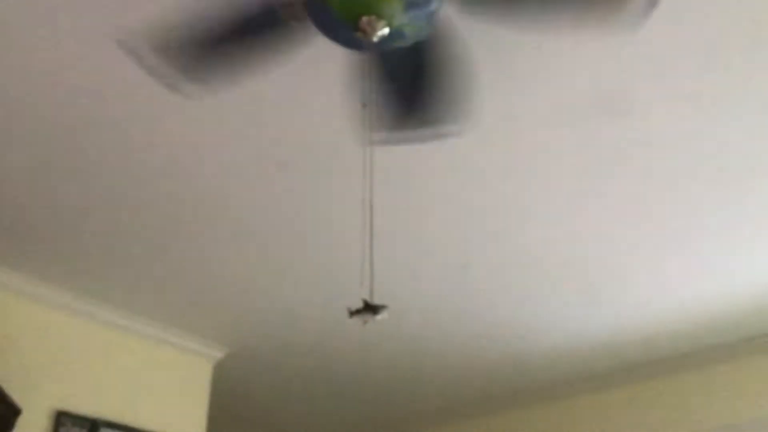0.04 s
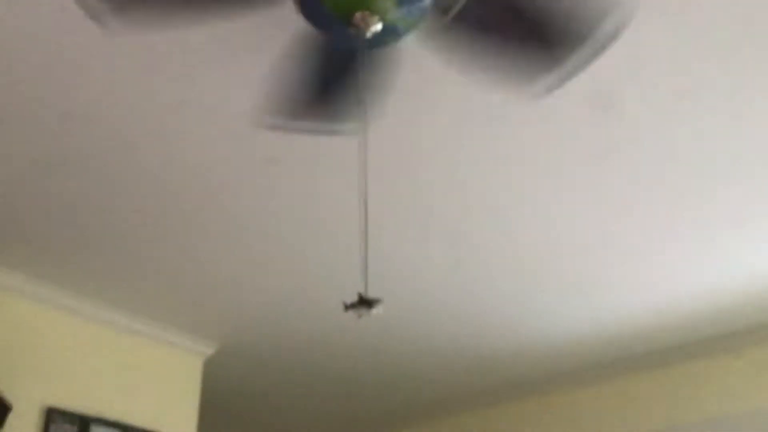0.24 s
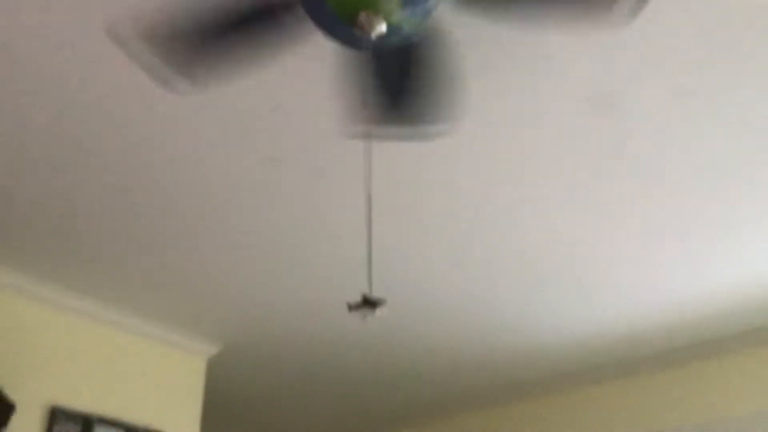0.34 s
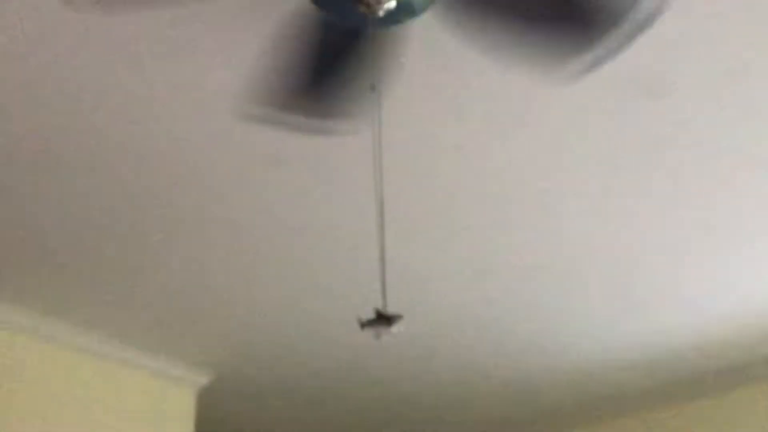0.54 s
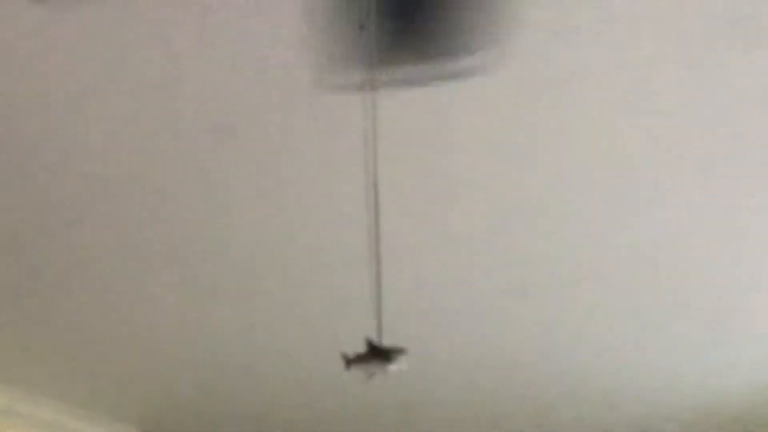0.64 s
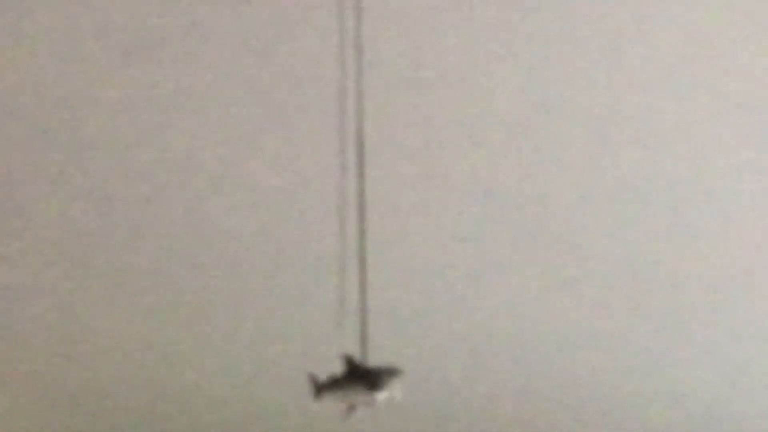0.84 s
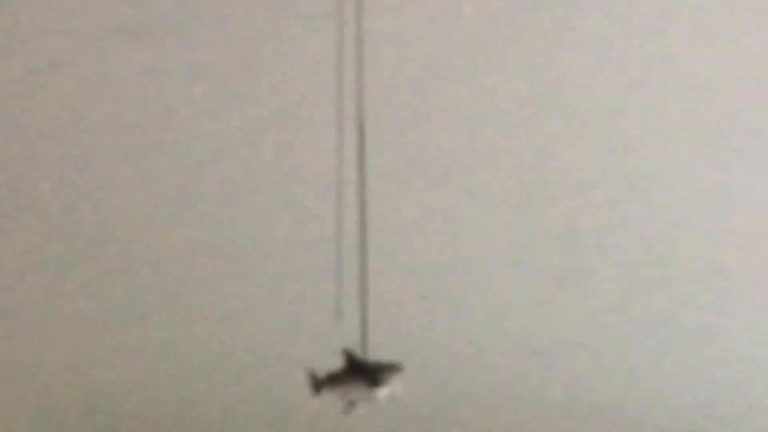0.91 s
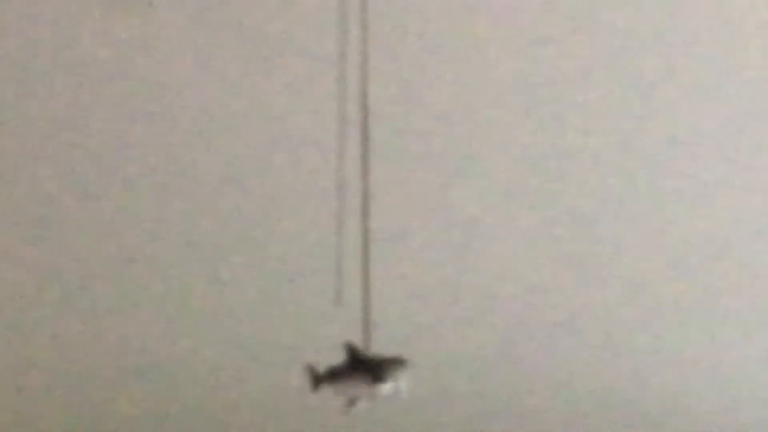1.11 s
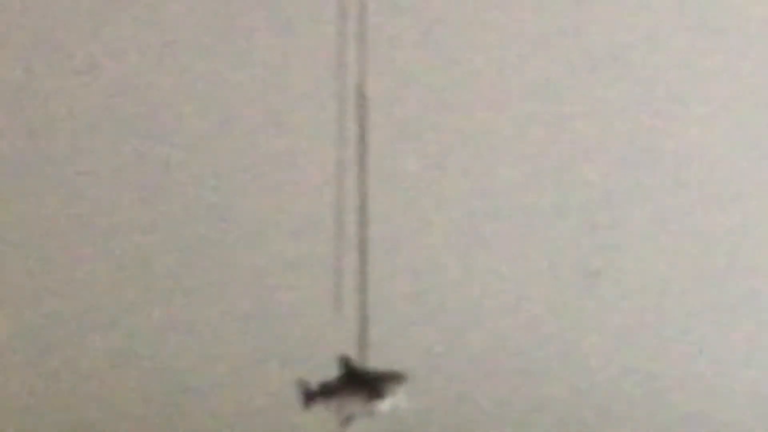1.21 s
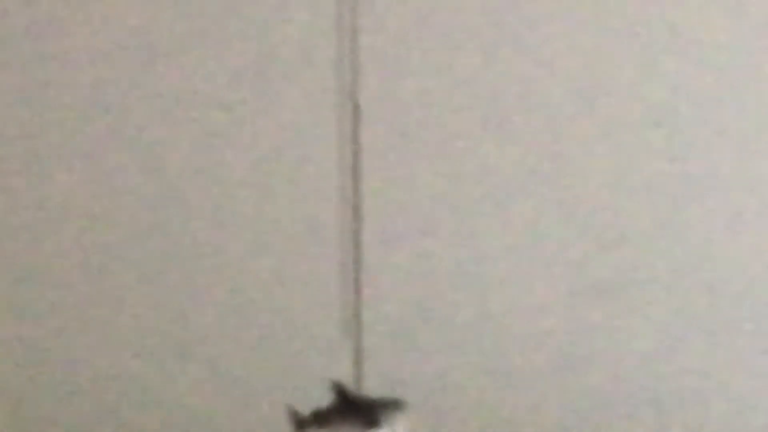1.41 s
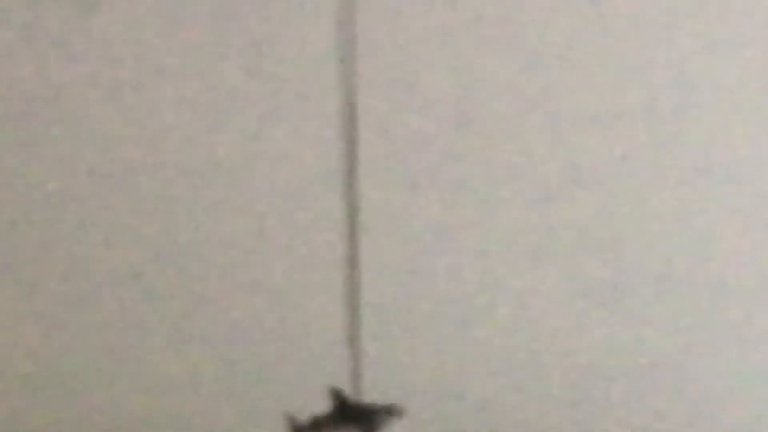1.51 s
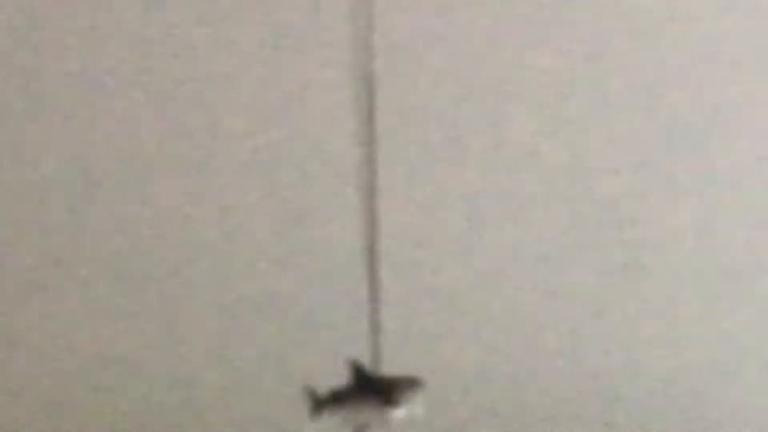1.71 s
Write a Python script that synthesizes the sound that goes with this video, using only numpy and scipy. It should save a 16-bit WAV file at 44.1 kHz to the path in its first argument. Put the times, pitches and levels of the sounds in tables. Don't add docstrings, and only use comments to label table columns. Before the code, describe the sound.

Camera handling noise, very close: soft thuds, hard plastic snaps and brief skin scuffs cluster in the first second, then thin out, over low ceiling-fan air, faint hiss and tiny lens ticks in a quiet room.

```python
import sys
import numpy as np
from scipy import signal
from scipy.fft import rfft, irfft, next_fast_len
from scipy.io import wavfile
from scipy.ndimage import uniform_filter1d

SR = 44100
rng = np.random.default_rng(int(sys.argv[2]) if len(sys.argv) > 2 else 0)


def linear_from_db(decibels):
    return 10 ** (np.asarray(decibels, float) / 20)


def unload_wav(signal):
    wavfile.write(
        sys.argv[1],
        SR,
        np.round(np.clip(np.atleast_2d(signal).T, -1, 1) * 32767).astype(np.int16),
    )


N = 77175
HZ = np.fft.rfftfreq(N, 1 / SR)


def evened(x):
    return x / np.sqrt(np.mean(x ** 2) + 1e-20)


def coloured(x, spectrum, tilt_db=0.):
    hz = np.fft.rfftfreq(len(x), 1 / SR) + 1
    f, db = np.transpose(spectrum)
    gain_db = np.interp(np.log(hz), np.log(f), db) + tilt_db * np.log2(hz / 2000)
    return irfft(rfft(x) * linear_from_db(gain_db), len(x))


def coloured_noise(spectrum):
    return evened(coloured(rng.standard_normal(N), spectrum))


def add(mix, s, sound):
    part = mix[round(s * SR):][:len(sound)]
    part += sound[:len(part)]


# f/Hz, level/dB
FAN_SPECTRUM = [(30, -45.5), (60, -0.5), (130, -2.5), (230, 1), (420, -5.5), (650, -17), (1500, -35.5),
                (3000, -50.5)]
# f/Hz, level/dB
HISS_SPECTRUM = [(1000, 13), (3000, 1), (5000, 3.5), (6200, -2), (8000, 1.5), (12600, -4), (14000, 1.5),
                 (14900, -6.5)]
FAN_DB, FAN_SWELL_DB, HISS_DB = -53.5, .8, -72.5


def air():
    swell = uniform_filter1d(rng.standard_normal(N), size=900)
    swell = evened(uniform_filter1d(swell, size=900))
    wash = coloured_noise([*FAN_SPECTRUM, (16000, -70)]) * linear_from_db(FAN_DB + FAN_SWELL_DB * swell)
    return wash + linear_from_db(HISS_DB) * coloured_noise([(200, -20), *HISS_SPECTRUM])


# first tick t/s, last tick t/s, rate/(ticks per s), level/dB
MOTOR_RUNS = [
    (.0110, .41, 60, -57),
    (.4277, .62, 30, -57),
    (.4460, .60, 30, -57),
    (.6277, 1.08, 60, -57),
    (1.1777, 1.47, 60, -57),
    (.0155, .46, 29.99, -57),
    (.6490, 1.75, 29.98, -57),
]
# f/Hz, width/Hz, level/dB
LENS_PARTS = [(3030, 290, -9.5), (5000, 560, -2), (7640, 630, -4.5), (9790, 560, -7.5), (13820, 450, -5)]
TICK_DB, TICK_JITTER_S = -1, .0001
RATTLE, RATTLE_S = .35, .0021


def lens():
    t = np.arange(200) / SR
    steps = np.zeros(N)
    rattle_fade = RATTLE * np.exp(-t / RATTLE_S) / np.sqrt(RATTLE_S * SR / 2)
    for first, last, rate, level_db in MOTOR_RUNS:
        for s in np.arange(first, last, 1 / rate):
            late = TICK_JITTER_S * rng.standard_normal()
            kick = (t == 0) + rattle_fade * rng.standard_normal(200)
            add(steps, s + late, linear_from_db(level_db + TICK_DB) * kick)
    ring = np.zeros(200)
    for k, (hz, width, db) in enumerate(LENS_PARTS):
        ring += (-1) ** k * linear_from_db(db) * np.exp(-np.pi * width * t) * np.sin(2 * np.pi * hz * t)
    return signal.oaconvolve(steps, ring)[:N]


# f/Hz, width/Hz, lift level/dB
CASE_MODES = [(590, 65, 6.5), (900, 140, 8), (1440, 73, 2.5), (2207, 106.5, 3.5), (2800, 140, 1.5),
              (4010, 500, 5), (5660, 730, 6.5)]


def case_db(hz):
    return sum(db / (1 + ((hz - f) / width) ** 2) for f, width, db in CASE_MODES)


# f/Hz, level/dB
SKIN_SPECTRUM = [(150, 11), (450, 3.5), (1000, -3.5), (2200, -2), (3150, -9.5), (3500, -17), (8000, -23.5),
                 (15000, -27.5)]
TREBLE_HZ = 3400
PATCH_DB, PATCH_HZ = 5, 600


def cased(x, tilt_db):
    hz = np.fft.rfftfreq(len(x), 1 / SR)
    knots_hz = np.arange(0, SR / 2 + PATCH_HZ, PATCH_HZ)
    patch_db = PATCH_DB * np.interp(hz, knots_hz, rng.standard_normal(len(knots_hz)))
    patch_weight = hz * TREBLE_HZ / (hz ** 2 + TREBLE_HZ ** 2) * 1.34
    gain = linear_from_db(case_db(hz) + patch_db * patch_weight)
    return irfft(rfft(coloured(x, SKIN_SPECTRUM, tilt_db)) * gain, len(x))


def slips(grain_db, count, per_s=5500):
    sign, chance, size = rng.random((3, count))
    size_db = grain_db * np.minimum(-np.log(1 - size), 4)
    return np.sign(sign - .5) * (chance < per_s / SR) * linear_from_db(size_db)


# t/s, level/dB
GRIP_LEVEL = [
    (0, -73),
    (.32, -63.5),
    (0.359, -55),
    (.6, -55.5),
    (0.929, -60.5),
    (.96, -80),
    (1.298, -54.5),
    (1.449, -69),
    (1.75, -67),
]
# f/Hz, level/dB
TREMOR_SPECTRUM = [(30, 0.5), (65, -15), (120, -0.5), (200, -16), (400, -37.5)]
TREMOR_DB, TREMOR_FOLLOW = -49, .95


def rubbing():
    t, db = np.transpose(GRIP_LEVEL)
    grip_db = np.interp(np.arange(N) / SR, t, db)
    friction = evened(cased(slips(grain_db=1.2, count=N), tilt_db=-2.4))
    tremor = coloured_noise([*TREMOR_SPECTRUM, (16000, -83.5)])
    tremor_db = TREMOR_DB + TREMOR_FOLLOW * (grip_db - db.max())
    return linear_from_db(grip_db) * friction + linear_from_db(tremor_db) * tremor


# start t/s, length t/s, level/dB, tilt/(dB per octave), place of the peak/(0-1)
SCUFFS = [(0.363, 0.027, -53.5, 2, 0.32), (0.408, 0.039, -56.5, -1, 0.9), (.459, 0.017, -42, 1, 0.06),
          (0.492, 0.02, -46, -0.5, 0.61), (0.516, 0.03, -51, -1, 0.44), (0.555, 0.016, -44.5, -0.2, 0.58),
          (0.606, 0.021, -40.5, 1.07, 0.18), (0.642, 0.021, -60, 1.5, 0.2), (0.6693, 0.026, -42, .5, 0.2),
          (0.719, 0.019, -46.5, 2, 0.06), (0.773, 0.0097, -51, 0.5, 0.8), (0.78, 0.015, -36.5, 2, 0.42),
          (0.8395, 0.017, -41, -0.5, 0.4), (0.864, 0.014, -40.5, -0.76, 0.5),
          (0.895, 0.02, -44.5, -1, 0.25), (0.9773, 0.036, -43, -0.5, 0.18), (1.002, .016, -32.5, 0.5, 0.4),
          (1.163, 0.023, -49.5, 2, 0.4), (1.189, 0.022, -50.5, 1.5, 0.4), (1.277, 0.022, -55.5, -1.5, 0.27),
          (1.291, 0.031, -49.5, -2, 0), (1.393, 0.028, -54, 0, 0.5), (1.433, 0.016, -59, 1, 0.47),
          (1.637, 0.019, -56.5, 2, 0.55)]
FADE_DB, EDGE = -4.5, .28
TREBLE_FADE_DB = -7
LEAD, SPAN = 256, 2560


def scuffs():
    out = np.zeros(N)
    highpass = signal.butter(4, TREBLE_HZ, "high", fs=SR, output="sos")
    for start, length, level_db, tilt_db, peak in SCUFFS:
        u = (np.arange(SPAN) - LEAD) / SR / length
        peak = np.clip(peak, .05, .9)
        away = np.where(u < peak, 1 - u / peak, (u - peak) / (1 - peak))
        ramps = np.minimum(u / min(EDGE, peak / 2), (1 - u) / EDGE)
        shape = np.clip(ramps, 0, 1) * linear_from_db(FADE_DB * away)
        burst = cased(slips(grain_db=5, count=SPAN) * shape, tilt_db)
        treble = signal.sosfiltfilt(highpass, burst)
        burst = burst - treble * (1 - linear_from_db(TREBLE_FADE_DB * away))
        burst *= np.sqrt(length * SR / np.sum(burst ** 2))
        add(out, start - LEAD / SR, linear_from_db(level_db) * burst)
    return out


def knocks(rows):
    out = 0
    case = linear_from_db(case_db(HZ))
    for s, peak_db, centre_hz, spread in rows:
        octaves = np.log2((HZ + 1) / centre_hz)
        hump = case * np.exp(-.5 * (octaves / max(spread, .025)) ** 2)
        height = linear_from_db(peak_db) * N / (2 * hump.sum())
        out = out - height * hump * np.exp(-2j * np.pi * HZ * s)
    return irfft(out, N)


# t/s, peak level/dB, centre f/Hz, spread/octaves
CATCHES = [(0.3506, -47.5, 700, 0.2), (0.3745, -43.5, 2230, 0.16), (0.3751, -47, 4340, 0.059),
           (0.4628, -56, 6000, 0.04), (0.4642, -47.5, 4130, 0.064), (0.4674, -49, 6100, 0.04),
           (0.5259, -55, 2540, 0.09), (0.5285, -50, 2630, 0.074), (0.5595, -55, 2610, 0.065),
           (0.5644, -41.5, 820, 0.32), (0.5648, -50, 2800, 0.08), (0.6085, -38.5, 2100, 0.1),
           (0.6086, -51.5, 5560, 0.025), (0.6092, -52.5, 8940, 0.03), (0.6144, -37.5, 1560, 0.24),
           (0.6147, -38, 2260, 0.13), (0.6757, -52, 5640, 0.065), (0.6762, -48.5, 3800, 0.06),
           (0.6786, -38, 2170, 0.12), (0.6821, -46, 1630, 0.15), (0.7183, -51, 2200, 0.11),
           (0.7186, -41, 2950, 0.096), (0.7217, -43, 1850, 0.1), (0.7227, -46, 4000, 0.11),
           (0.7753, -50, 3790, 0.06), (0.7819, -48, 4130, 0.063), (0.7868, -37.5, 5380, 0.06),
           (0.7869, -58, 6830, 0.03), (0.7951, -52, 4740, 0.0494), (0.8467, -41, 1640, 0.15),
           (0.847, -43, 2550, 0.09), (0.8725, -57, 5080, 0.034), (0.873, -54, 3920, 0.06),
           (0.8999, -44, 2090, 0.13), (0.9036, -45.5, 2320, 0.09), (0.9803, -48, 2520, 0.12),
           (0.9878, -39.5, 2050, 0.093), (0.9931, -38, 2270, 0.14), (0.9949, -38, 1850, 0.12),
           (0.9953, -54, 4520, 0.04), (1.0072, -36.5, 4950, 0.047), (1.0087, -47.5, 7580, 0.034),
           (1.0099, -40.5, 5000, 0.058), (1.0102, -43, 3910, 0.097), (1.0155, -45, 4740, 0.05),
           (1.1663, -46, 1230, 0.29), (1.1904, -40, 593, 0.33), (1.2011, -53, 2280, 0.1)]


def catches():
    return knocks(CATCHES)


# t/s, peak level/dB, centre f/Hz,
# spread/octaves
SNAPS = [(.352, -38.5, 1480, 0.6), (.374, -33.5, 1365, 0.25), (.4070, -50, 900, 0.59),
         (.436, -44, 1220, 0.69), (.7872, -22.5, 2800, 0.0785), (.764, -60.5, 2100, .2),
         (.4632, -28, 2120, 0.21), (.4635, -27.5, 900, 0.72), (.506, -32.5, 1780, 0.39),
         (.564, -40.5, 1490, 0.34), (.6075, -21, 900, 0.56), (.608, -29, 2800, 0.15),
         (.674, -23, 597, 0.36), (.675, -26.5, 2020, 0.33), (.8715, -41.5, 760, 0.09),
         (.779, -36.5, 661, 0.14), (.7869, -11.5, 2037, 0.15), (.7866, -22, 3600, 0.17),
         (.7862, -17, 1540, 0.26), (.787, -34.5, 8870, .07), (.7895, -18.5, 2407, 0.44),
         (.843, -34, 1890, 0.22), (.872, -39, 2100, 0.33), (1.010, -17.5, 1495, 0.43),
         (1.011, -42.5, 930, 0.079), (.9045, -48, 3680, 0.27), (1.174, -29.5, 1380, 0.4),
         (1.192, -46, 2000, 0.23), (1.298, -47.5, 1480, 0.2), (1.649, -54.5, 2480, 0.11),
         (1.682, -42, 736, 0.15), (1.682, -55, 1814, 0.2)]


def snaps():
    return knocks(SNAPS)


# t/s, peak level/dB, centre f/Hz, spread/octaves
THUDS = [(.194, -25.5, 272, 0.53), (.350, -39.5, 258, 0.3), (.373, -28.5, 188, 0.75),
         (.421, -44.5, 318, 0.16), (.461, -37.5, 248, 0.53), (.506, -39, 296, 0.49), (.559, -33, 167, 0.4),
         (.567, -37, 202, 1.1), (.608, -35.5, 164, 0.43), (.623, -32, 178, 0.71), (.673, -25, 277, 0.43),
         (.677, -29.5, 113, 0.34), (.717, -22, 242, 0.89), (.779, -23, 270, 0.67), (.843, -33, 583, 0.26),
         (.871, -35.5, 418, 0.19), (.905, -34.5, 574, 0.23), (.917, -39, 308, 0.45),
         (1.007, -27, 242, 0.38), (1.0075, -24.5, 400.3, 0.14), (1.171, -30, 304, 0.34),
         (1.178, -40.5, 330, 0.22), (1.195, -33.5, 85, 0.59), (1.204, -31.5, 175, 0.93),
         (1.297, -36.5, 380, 0.26), (1.436, -35, 218, 0.83), (1.433, -29, 93.5, 0.73),
         (.776, -27.5, 103, 0.65), (1.641, -33.5, 124, 0.91), (1.648, -30.5, 359, 0.57),
         (.121, -47.5, 214, 0.18), (.348, -56, 208, .2), (.720, -32.5, 111, 0.41), (.903, -40, 310, 0.22),
         (.911, -41, 231, .2), (1.189, -48, 140, 0.42), (.608, -44.5, 290, 0.11), (.464, -46, 570, 0.081),
         (1.652, -44, 72, .3), (.612, -41.5, 91, 0.25)]


def thuds():
    return knocks(THUDS)


def scene():
    room = air() + lens()
    hand = rubbing() + scuffs()
    return (room + hand + catches() + snaps() + thuds())[None]


def band_limit(x):
    return signal.sosfilt(signal.butter(12, 16480, fs=SR, output="sos"), x)


LAG_CYCLES, LAG_FLOOR_HZ = 2.65, 2.7
LOW_CUT_HZ, TOP_HZ = 67.4, 15950


def record(dry):
    size = next_fast_len(N + SR // 2)
    hz = np.fft.rfftfreq(size, 1 / SR) + LAG_FLOOR_HZ
    lag = np.exp(-2j * np.pi * LAG_CYCLES * (np.log(hz / 16000) - hz / 16000))
    low_cut = 1 / np.sqrt(1 + (LOW_CUT_HZ / hz) ** 10)
    high_cut = 1 / np.sqrt(1 + (hz / TOP_HZ) ** 240)
    before = dry[:, 4000:0:-1] * .5
    wrapped = np.concatenate([dry, np.zeros((1, size - N - 4000)), before], axis=1)
    mix = irfft(rfft(wrapped) * lag * low_cut * high_cut, size)[:, :N]
    return band_limit(mix)


dry = scene()
out = record(dry)
unload_wav(out)
```